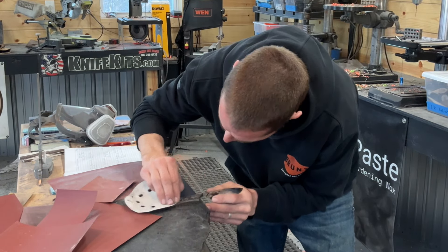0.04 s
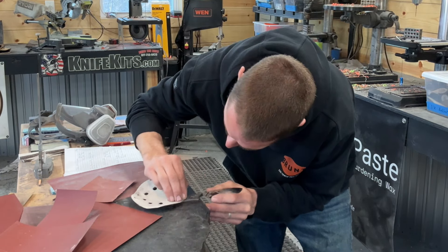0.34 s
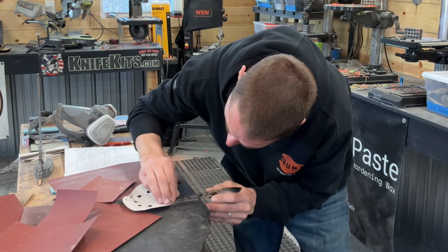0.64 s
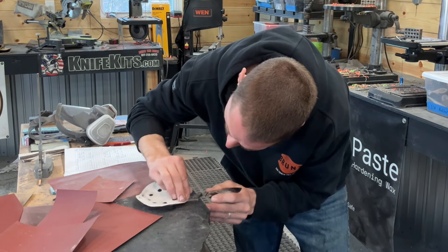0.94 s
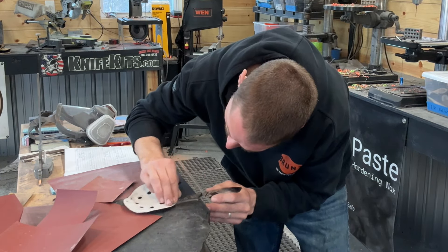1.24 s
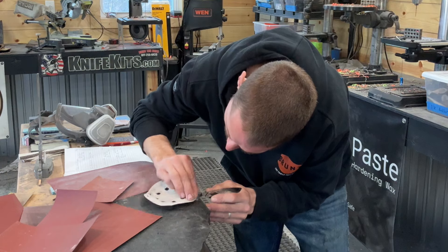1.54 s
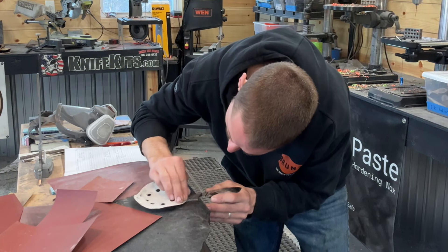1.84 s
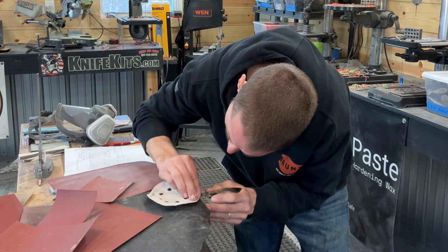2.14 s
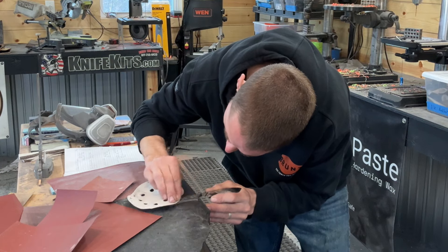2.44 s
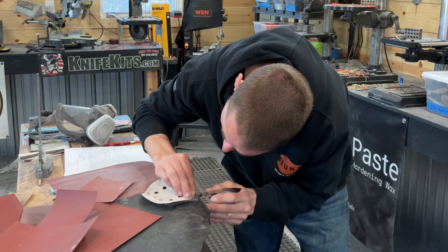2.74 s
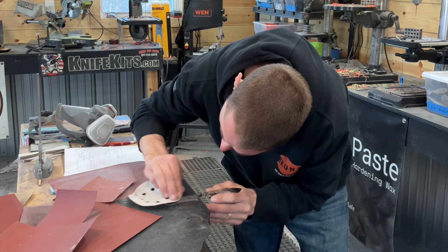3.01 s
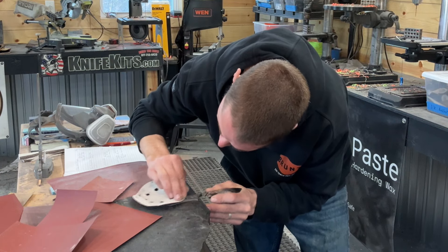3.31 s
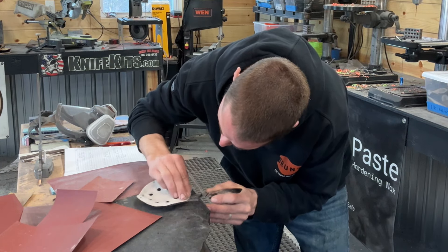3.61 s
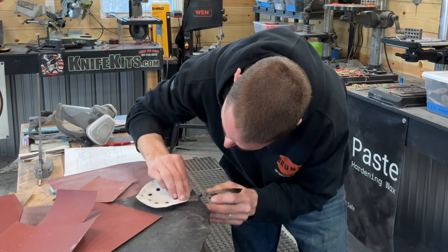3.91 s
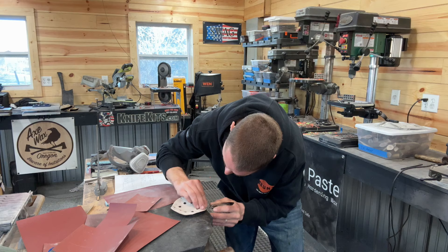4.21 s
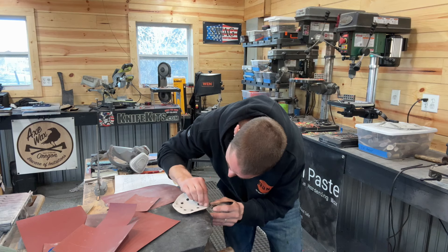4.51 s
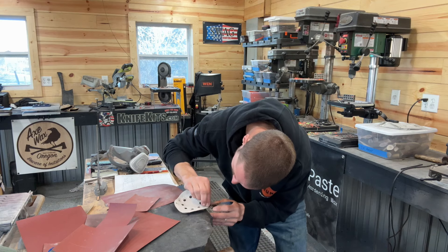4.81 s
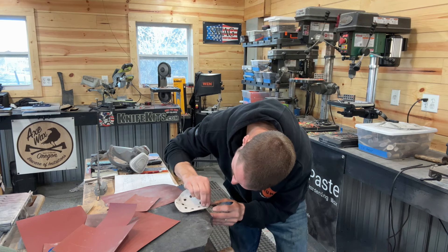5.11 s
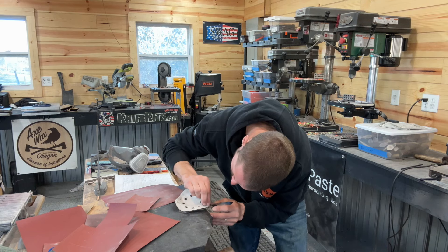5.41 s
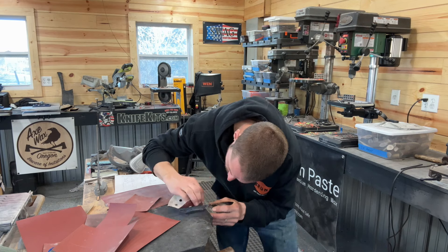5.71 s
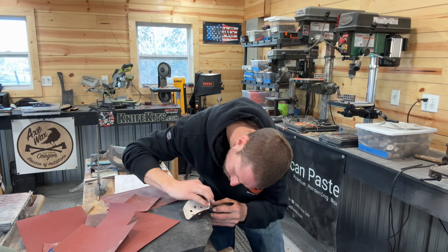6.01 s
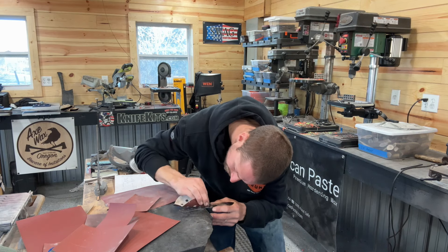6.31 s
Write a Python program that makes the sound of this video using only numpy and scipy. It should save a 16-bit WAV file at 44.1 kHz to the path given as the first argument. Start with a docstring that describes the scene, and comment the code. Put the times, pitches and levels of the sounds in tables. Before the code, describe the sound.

Rapid, hissy hand sanding on a knife blank, with soft thumps on the workbench, followed by much quieter fluttering scrapes and light taps.

```python
"""Sanding a steel knife blank

Coarse sandpaper rubs back and forth, ten strokes a second, in a small workshop. Friction of the grit
makes a hiss that the blade's resonances colour faintly; the stiff paper snaps, and hard strokes knock
the work on the bench, exciting its modes. From 4.25 s the same work runs four times as fast:
the strokes blur into a thin flutter, and the knocks are higher and shorter."""
import sys
import numpy as np
from scipy import signal
from scipy.fft import rfft, irfft
from scipy.io import wavfile
from scipy.ndimage import uniform_filter1d

SR = 44100
rng = np.random.default_rng(int(sys.argv[2]) if len(sys.argv) > 2 else 0)


def put_to_file(sound):
    """Save the sound as 16-bit audio at rate SR, in the file named by the first command-line argument."""
    columns = np.atleast_2d(sound).T  # one column per channel
    safe = np.clip(columns, -1, 1)
    whole_steps = np.round(safe * 32767)
    wavfile.write(sys.argv[1], SR, whole_steps.astype(np.int16))


N = 280035
TIME, HZ = np.arange(N) / SR, np.fft.rfftfreq(N, 1 / SR)
FAST_FROM_S, FAST_SPEED = 4.25, 4

# Strokes, each lasting until the next: start t/s, relative level/dB, tilt/(dB per octave)
STROKES = [(0.495, -32.5, 1.5), (0.611, -27.5, 0.6), (0.728, -26.5, 4.5), (0.824, -24.5, 0),
           (0.919, -27, 3), (1.014, -24.5, -0.5), (1.107, -25.5, 3), (1.213, -24, 0), (1.329, -28, 3.5),
           (1.428, -24, 0.9), (1.527, -26.5, 2), (1.625, -25, 2.5), (1.724, -24.5, 2), (1.823, -25.5, 2),
           (1.921, -23.5, 3.5), (2.008, -28.5, 0), (2.124, -41.5, -6.5), (2.25, -35.5, -2),
           (2.324, -26.5, 5), (2.441, -23, 1), (2.538, -25, 3.5), (2.643, -23.5, 2.8), (2.741, -27.5, 2),
           (2.84, -25.5, -0.1), (2.929, -28.5, 3.5), (3.036, -27, 0.5), (3.128, -30, 2.8),
           (3.236, -25.5, 0.5), (3.335, -27, 4), (3.438, -26, 0.2), (3.573, -31, 3), (3.685, -22.5, 1.8),
           (3.779, -32, 0.1), (3.923, -29, 0.5), (4.037, -32, 1), (4.142, -32, -1)]
# Resonance of the bent paper as the grip changes: t/s, f/Hz, gain/dB
PAPER_RESONANCE = [(1.1, 7900, 0.5), (1.72, 3250, 7), (2.25, 3100, 7.5), (2.44, 7000, 1.5),
                   (3.6, 7170, 4.5), (3.66, 4900, 4.5)]
# Spectrum of rubbing grit: f/Hz, relative density level/dB
GRIT_SPECTRUM = [(30, -29), (80, -18), (350, -17), (900, -19), (1300, -10.5), (1900, -9), (2450, -2),
                 (3600, -1), (4500, 1), (7000, 0), (8700, -3), (9800, -4), (11300, -6), (15500, -6)]

def sanding(bite=0.66, release=1.62, pause_s=0.0083, paper_octaves=0.14):
    """Friction noise follows sliding speed: each stroke bites quickly and fades as the hand slows."""
    scratches = flex(grit(per_s=1500, coarse_db=-5.5, uneven_db=1.2), depth_db=2.1)
    # the sheet drags a little even while the hand turns
    out = scratches * amp(-38) * np.interp(TIME, [.5, .85], [0, 1])
    ends = [stroke[0] for stroke in STROKES[1:]] + [FAST_FROM_S]
    grip_s, grip_hz, grip_db = np.transpose(PAPER_RESONANCE)
    for (start, db, tilt_db), end in zip(STROKES, ends):
        stroke = unit(scratches[:, round(start * SR):round((end - pause_s) * SR)])
        n = stroke.shape[1]
        hz = np.maximum(np.fft.rfftfreq(n, 1 / SR), 1500)  # tone is flat below 1500 Hz
        paper_hz, paper_db = np.interp(start, grip_s, grip_hz), np.interp(start, grip_s, grip_db)
        paper_peak = np.exp(-.5 * (np.log2(hz / paper_hz) / paper_octaves) ** 2)
        tone_db = tilt_db * np.log2(hz / 6000) + paper_db * paper_peak
        progress = (np.arange(n) + .5) / n
        arch = np.sin(np.pi * progress) ** np.where(progress < .5, bite, release)
        push = amp(db - 1.5 - progress) * arch  # sags 1 dB along the stroke
        add(out, start, push * irfft(rfft(stroke) * amp(tone_db), n))
    return amp(0.6) * colour(blade(out), GRIT_SPECTRUM)


def grit(per_s, coarse_db, uneven_db):
    """Superposition: countless scratches sum to noise, coarse grains click, uneven grip modulates both."""
    grains = rng.uniform(-0.93, 1, (2, N)) * (rng.random(N) < per_s / SR)
    grip = amp(uneven_db * np.clip(wander(70), -2, 2))
    return unit((rng.standard_normal((2, N)) + amp(coarse_db) * unit(grains)) * grip)


def flex(x, depth_db):
    """Time-varying filtering: the sheet bends as it travels, so its small resonances come and go."""
    spectra = signal.stft(x, SR, nperseg=512)[2]
    patches = rng.standard_normal(spectra.shape[1:])
    for axis in (0, 1):  # smooth over frequency, then time
        patches = uniform_filter1d(patches, size=7, axis=axis)
    return unit(signal.istft(spectra * amp(depth_db * unit(patches)), SR, nperseg=512)[1][:, :N])


# Blade resonances: f/Hz, bandwidth/Hz, gain when gripped/dB, gain when free/dB
BLADE_MODES = [(2316, 63, 5, 1.5), (2620, 45, 3.5, -3), (3000, 100, 6, 8), (4380, 170, 1.5, 6.5),
               (5400, 270, 1, 5), (5600, 200, -1.6, 1.5), (6900, 220, 3, -1)]

def blade(friction, grip_eases_s=3.65, change_s=0.04):
    """Forced vibration: friction drives the blade, which rings more freely once the grip eases."""
    gripped = resonate(friction, [(hz, width, db) for hz, width, db, _ in BLADE_MODES])
    free = resonate(friction, [(hz, width, db) for hz, width, _, db in BLADE_MODES])
    eased = np.clip((TIME - grip_eases_s) / change_s, 0, 1)
    return gripped + eased * (free - gripped)


# Shifts of the paper at speed: centre t/s, Gaussian width/s, relative scrape and slide levels/dB
PAPER_SHIFTS = [(4.261, 0.01, -44.5, -31.5), (4.299, 0.018, -46, -30.5), (4.331, 0.0064, -48, -26),
                (4.369, 0.027, -43, -33.5), (4.517, 0.016, -51.5, -50), (4.577, 0.012, -47, -66),
                (5.613, 0.0082, -53, -31.5), (5.686, 0.012, -49, -40), (6.133, 0.0085, -54, -54),
                (6.172, 0.014, -43.5, -30.5), (6.212, 0.016, -43, -50), (6.282, 0.025, -51, -48)]
# Resonances of the fast work: f/Hz, bandwidth/Hz, gain/dB
FAST_MODES = [(465, 24, 5), (1970, 110, 2), (2450, 43, 8), (3780, 82, 4.5), (4720, 220, 4)]
# Spectra of fast scraping and of sliding paper: f/Hz, relative density level/dB
SCRAPE_SPECTRUM = [(80, -47), (200, -7.5), (650, -8.5), (1400, -6), (1800, 0), (3000, -2.5), (6200, -2),
                   (8300, 1), (9500, -6.5)]
SLIDE_SPECTRUM = [(6000, -61), (8000, -22), (9200, 3), (12500, 1.5), (15000, 4.5)]

def fast_work(flutter_hz=38.08, depth=.35, trough_s=4.592):
    """Amplitude modulation: rapid strokes blur into a flutter; the paper slides before and after it."""
    phase = 2 * np.pi * flutter_hz * (TIME - trough_s) + 0.42 * wander(27)
    flutter = 1 - depth * np.cos(phase)
    run = flutter * held(start=4.585, hold_s=1.004, rise_s=0.0096, fade_db_per_s=213.5)
    scrape, slide = amp(-48) * run, amp(-55) * run
    for centre_s, width_s, scrape_db, slide_db in PAPER_SHIFTS:
        swell = np.exp(-.5 * ((TIME - centre_s) / width_s) ** 2)
        scrape += amp(scrape_db - 2.5) * swell
        slide += amp(slide_db - 7.5) * swell
    scratches = flex(grit(per_s=4500, coarse_db=-6, uneven_db=1.1), depth_db=1.9)
    scratches = unit(resonate(scratches, FAST_MODES))
    sound = scrape * colour(scratches, SCRAPE_SPECTRUM) + slide * colour(scratches, SLIDE_SPECTRUM)
    return stereo(sound, coherence=0.61) * amp([[-.5], [.5]])


# Blows of the rocking work on the bench: t/s, relative level/dB
KNOCKS = [(.078, -23.5), (.16, -27.5), (.25, -30.5), (.344, -31), (.447, -30), (1.261, -24.5), (1.358, -31),
          (1.454, -32.5), (1.79, -27.5), (1.876, -33.5), (1.969, -29), (2.059, -31), (2.162, -30),
          (2.264, -32), (2.374, -28.5), (2.698, -29), (2.787, -30.5), (2.884, -30), (2.981, -29),
          (3.074, -30), (3.175, -30), (3.273, -29.5), (3.375, -29), (3.473, -29), (3.582, -31),
          (4.337, -26), (4.374, -29.5), (4.42, -25.5), (4.788, -23), (5.524, -25), (5.546, -28.5),
          (5.57, -31), (5.595, -29.5)]
# Bench modes: f/Hz, relative level/dB, T60/s
BENCH_MODES = [(80, -30.5, 0.32), (116.1, -25, 0.99), (165.7, -20, 0.46), (298, -21, 0.23),
               (227, -21.5, 0.33), (346.7, -14, 0.15), (530.7, -16, 0.17), (613, -17, 0.38),
               (647, -16, 0.2), (695.5, -20, 0.22), (736, -2.5, 0.018), (1174, -6, 0.021)]
# Dense boom of bench and room: f/Hz, relative density level/dB
BOOM_SPECTRUM = [(35, -27), (75, -8.5), (98, -13), (165, -2.5), (265, -9), (345, -1), (430, -10.5),
                 (620, -4), (800, -13), (1050, -16), (1300, -11.5), (2500, -26)]

def knocks(boom_t60=0.38, linger_t60=1.0, rebound_s=.029):
    """Impact excitation: a blow rings the bench's damped modes; a duller one follows as the work drops."""
    t, out = TIME[:SR // 2], np.zeros((2, N))
    ring = sum(amp(db - 60 * t / t60) * np.sin(2 * np.pi * hz * t) for hz, db, t60 in BENCH_MODES)
    ring *= np.minimum(t / 0.0012, 1)
    ring /= abs(ring).max()
    rebound = amp(-2) * signal.lfilter(*signal.butter(2, 480, fs=SR), ring)
    boom = colour(rng.standard_normal((2, N)), BOOM_SPECTRUM)
    boom = stereo(boom, np.interp(HZ, [160, 500], [.88, .15]))  # long waves reach both sides alike
    envelope = np.hypot(amp(-10 - 60 * t / boom_t60), amp(-15 - 60 * t / linger_t60))
    envelope *= np.minimum(t / 0.0081, 1)
    for start, db in KNOCKS:
        place, lag = rng.random(2)
        offset = int(place * (N - len(t)))
        knock = ring + envelope * boom[:, offset:offset + len(t)]
        add(knock, rebound_s + 0.0042 * (lag - .5), rebound[None])
        # a high-pass at 55 Hz keeps the knocks free of rumble
        knock = signal.lfilter(*signal.butter(2, 55, "high", fs=SR), knock)
        if start > FAST_FROM_S:  # time compression raises every frequency
            knock = signal.resample_poly(knock, 1, FAST_SPEED, axis=1)
        add(out, start, amp(db - 2) * knock)
    return out


# Snaps and catches of the paper: t/s, relative peak level/dB, centre f/Hz
PAPER_SNAPS = [(0.019, -15, 4030), (0.027, -20, 1620), (0.242, -27.5, 5000), (0.3672, -22.5, 7500),
               (0.449, -37.5, 3000), (0.623, -17.5, 5330), (1.157, -14.5, 7590), (1.2182, -15, 2820),
               (1.225, -15, 4200), (1.852, -9.5, 6500), (1.927, -15.5, 5370), (2.043, -9.5, 5800),
               (3.445, -16.5, 5000), (4.052, -13, 5460), (5.6745, -36.5, 9600), (6.154, -32, 11000),
               (6.2007, -28.5, 8600)]

def snaps(decay_s=0.0022):
    """Short transients have broad spectra: the stiff paper snaps in fast-decaying bursts of noise."""
    t, out = TIME[:SR // 50], np.zeros((2, N))
    for start, db, hz in PAPER_SNAPS:
        band = signal.butter(1, [hz * 0.85, hz * 1.18], "band", fs=SR)
        burst = signal.lfilter(*band, rng.standard_normal((2, len(t))) * np.exp(-t / decay_s))
        add(out, start, amp(db + 1) * burst / abs(burst).max())
    return out


# Finger presses: start t/s, hold/s, relative level/dB, decay rate/(dB per s)
PRESSES = [(-0.01, 0.14, -39, 53.5), (0.004, 0.025, -35.5, 902), (0.046, 0.016, -34.5, 696),
           (0.205, 0.043, -33.5, 136), (0.303, 0.013, -43, 600)]
# Spectrum of the pressed sheet: f/Hz, relative density level/dB
RUSTLE_SPECTRUM = [(60, -18), (400, 1), (1100, -2.5), (2000, 6.5), (4300, 4.5), (9000, 2), (15500, -4.5)]

def rustle(rise_s=0.017):
    """Random impulses in noise: the sheet crackles as the fingers press it into place."""
    envelope = sum(amp(db) * held(start, hold_s, rise_s, fade) for start, hold_s, db, fade in PRESSES)
    return envelope * colour(grit(per_s=2300, coarse_db=-3.5, uneven_db=2.5), RUSTLE_SPECTRUM)


# Reverberation time of the workshop: f/Hz, T60/s
ROOM_T60 = [(100, 1), (4000, 0.55), (16000, 0.34)]

def room(x, tail_db, early_db):
    """Reverberation: early reflections from bench top and walls, then a tail that dies band by band."""
    n = SR // 2
    echoes = rng.standard_normal((2, n)) * (rng.random((2, n)) < 3000 / SR) * (TIME[:n] > .008)
    hz, t, spectra = signal.stft(echoes, SR, nperseg=256)
    decay = amp(-60 * t / curve(ROOM_T60, hz)[:, None])
    tail = signal.istft(spectra * decay, SR, nperseg=256)[1]
    response = amp(tail_db) * tail / np.linalg.norm(tail, axis=1, keepdims=True)
    for path in response:
        path[rng.integers(SR // 700, SR // 90, size=8)] += amp(early_db) * rng.choice([-1, 1], size=8)
    response[:, 0] += 1  # direct sound
    response /= np.linalg.norm(response, axis=1, keepdims=True)
    return signal.fftconvolve(x, response, axes=1)[:, :N]


# Glide of a faint hiss: t/s, lower edge f/Hz, relative level/dB
HISS_GLIDE = [(5.70, 1500, -61), (5.73, 4520, -51.5), (5.77, 10400, -62), (5.84, 14800, -61),
              (5.92, 15800, -76), (5.96, 7500, -60.5), (6.02, 6020, -79)]

def gliding_hiss():
    """High-pass filtered noise: a faint hiss whose cutoff sweeps up and back."""
    hz, t, spectra = signal.stft(rng.standard_normal((2, N)), SR, nperseg=256)
    times, edge_hz, db = np.transpose(HISS_GLIDE)
    ratio = hz[:, None] / np.interp(t, times, edge_hz)
    shape = ratio ** 18 / (1 + ratio ** 19)  # steep below the edge, 1/f above
    level = amp(np.interp(t, times, db, left=-np.inf))
    return stereo(signal.istft(spectra * shape * level, SR, nperseg=256)[1][:, :N], coherence=0.49)


# The background sinks and swells back: t/s, relative level/dB
AIR_LEVEL = [(5.69, 1.5), (5.74, -21), (5.85, -2), (5.95, -1.5), (6.08, 8)]
# Spectrum of the background: f/Hz, relative density level/dB
AIR_SPECTRUM = [(60, -23.5), (450, 13.5), (1300, 11), (15000, -11)]

def shop_air():
    """Ambient noise: the still air of the shop sets a faint broadband floor."""
    level = amp(-85 + np.interp(TIME, *np.transpose(AIR_LEVEL)))
    return level * stereo(colour(rng.standard_normal((2, N)), AIR_SPECTRUM), coherence=.6)


def amp(db):
    """Amplitude ratio of a level."""
    return 10 ** (np.asarray(db) / 20)


def unit(x):
    """Normalisation to rms 1."""
    return x / np.sqrt(np.mean(x ** 2) + 1e-20)


def curve(points, hz):
    """Linear interpolation of (f/Hz, value) points on a log-frequency axis."""
    f, value = np.transpose(points)
    return np.interp(np.log(hz + 1), np.log(f + 1), value)


def add(mix, start, sound):
    """Superposition of a sound on the mix from a start time in seconds."""
    part = mix[:, round(start * SR):][:, :sound.shape[1]]
    part += sound[:, :part.shape[1]]


def held(start, hold_s, rise_s, fade_db_per_s):
    """Envelope with a linear rise, a plateau and an exponential decay."""
    t = TIME - start
    return np.clip(t / rise_s, 0, 1) * amp(-fade_db_per_s * np.maximum(t - hold_s, 0))


def wander(rate_hz):
    """Low-pass noise: a slow random fluctuation of rms 1."""
    return unit(irfft(rfft(rng.standard_normal(N)) / (1 + (HZ / rate_hz) ** 4), N))


def colour(x, spectrum):
    """Spectral shaping that conserves the power of white noise."""
    return irfft(rfft(x) * unit(amp(curve(spectrum, HZ))), N)


def resonate(x, modes):
    """Resonance: each mode (f/Hz, bandwidth/Hz, gain/dB) lifts or cuts a narrow band."""
    response = 1 + sum((amp(db) - 1) / (1 + 1j * (HZ - hz) / (width / 2)) for hz, width, db in modes)
    return irfft(rfft(x) * response, N)


def stereo(x, coherence, phase=0):
    """Partial coherence: the sum and difference of two independent signals give left and right."""
    a, b = rfft(x)
    mid, side = a * np.sqrt((1 + coherence) / 2), b * np.sqrt((1 - coherence) / 2)
    return irfft(np.array([mid + side, (mid - side) * np.exp(-1j * phase)]), N)


# Left/right likeness of the near sounds, with left and right opposed near 9.5 and 14.5 kHz: f/Hz, coherence,
# left lead/rad
STEREO_IMAGE = [(150, .88, 0), (800, .45, 0), (2200, .7, 0), (4000, .52, 0), (7400, .78, 0),
                (8500, .55, 1.4), (9200, .98, 3.1), (10100, .95, 3.2), (10700, .55, 4.7),
                (11400, .96, 6.28), (12600, .95, 6.3), (13400, .6, 7.8), (14400, .98, 9.4),
                (16000, .9, 9.5)]

def scene():
    """Superposition of the near paper sounds, the bench, the fast work and the background."""
    slow = TIME < FAST_FROM_S  # the slow strokes and their echoes stop abruptly at 4.25 s
    crackle = snaps()
    reverberant = room(sanding() + crackle, tail_db=-8, early_db=-25)
    near = np.where(slow, reverberant, crackle) + rustle()
    hz, coherence, phase = np.transpose(STEREO_IMAGE)
    near = stereo(near, np.interp(HZ, hz, coherence), np.interp(HZ, hz, phase)) * amp([[-.5], [.5]])
    return near + knocks() + fast_work() + gliding_hiss() + shop_air()


def record(dry):
    """Band limiting: a low-pass filter removes the treble above 15.8 kHz."""
    low_pass = signal.firwin(511, 15800, window=("kaiser", 9), fs=SR)
    return signal.oaconvolve(dry, low_pass[None], "same")


dry = scene()
out = record(dry)
put_to_file(out)
```